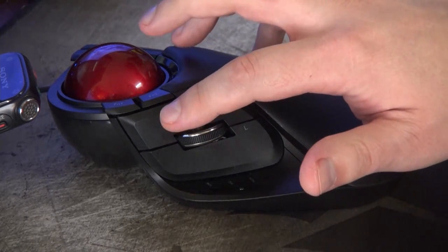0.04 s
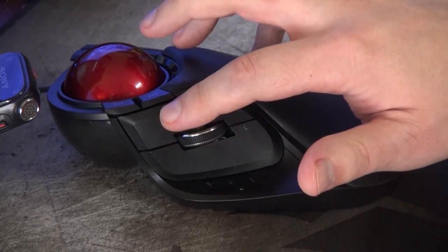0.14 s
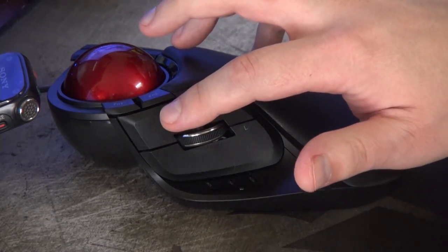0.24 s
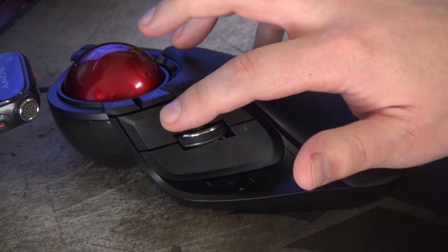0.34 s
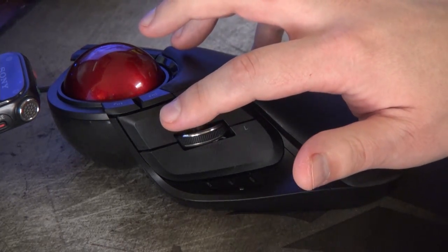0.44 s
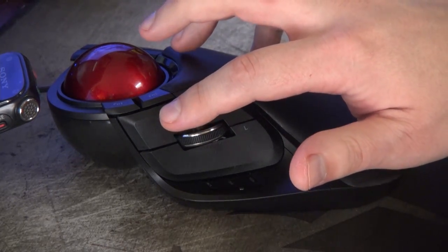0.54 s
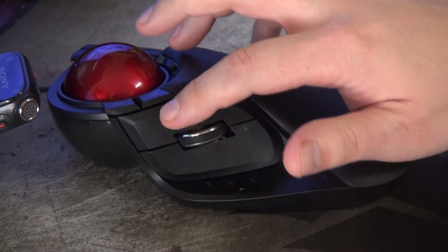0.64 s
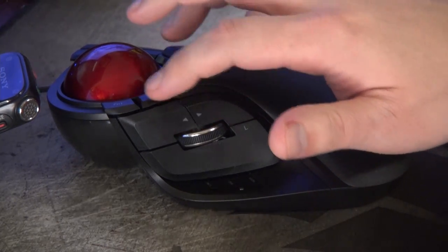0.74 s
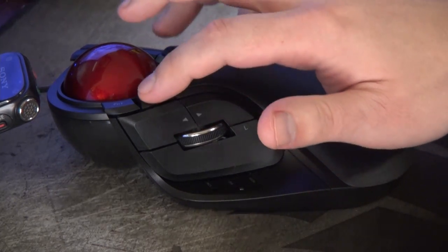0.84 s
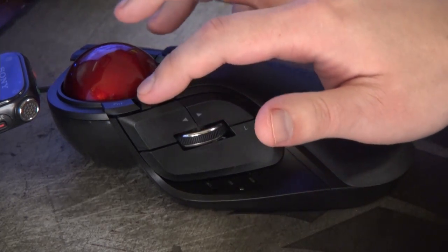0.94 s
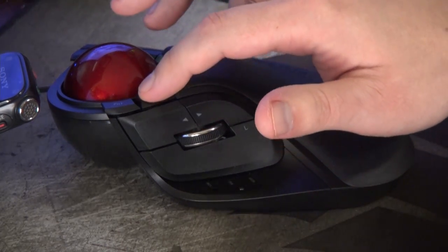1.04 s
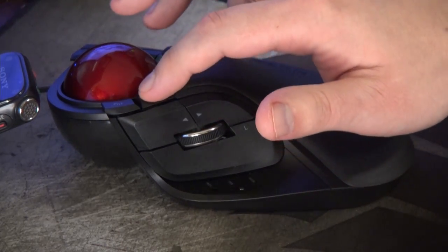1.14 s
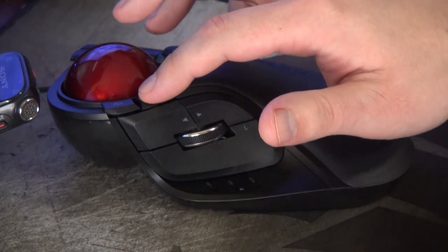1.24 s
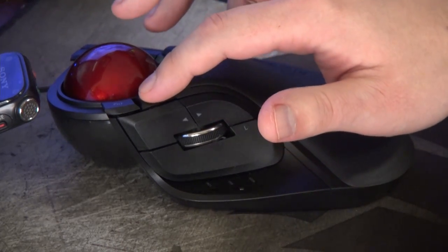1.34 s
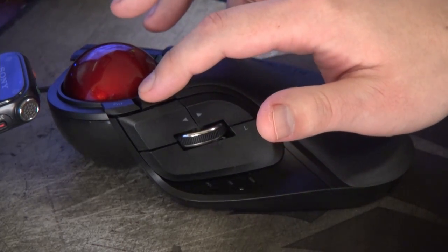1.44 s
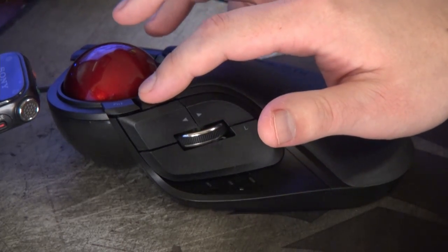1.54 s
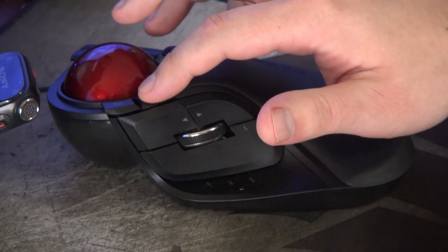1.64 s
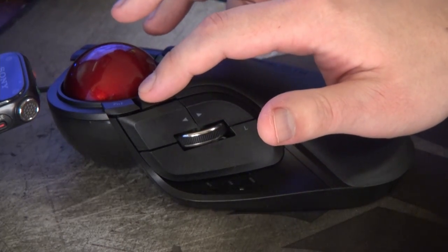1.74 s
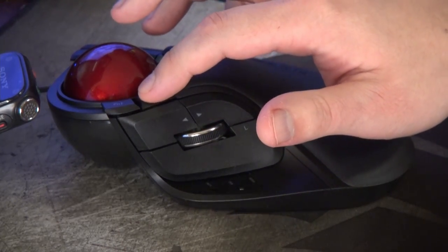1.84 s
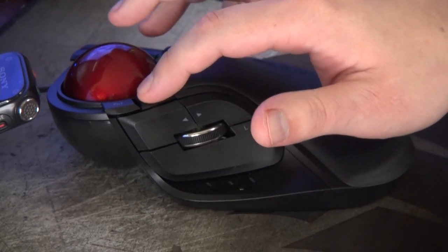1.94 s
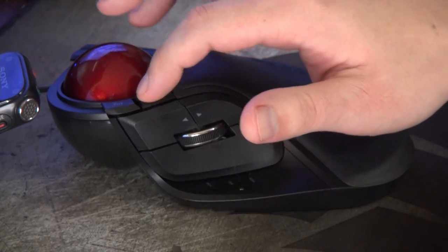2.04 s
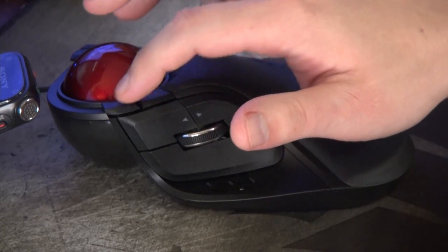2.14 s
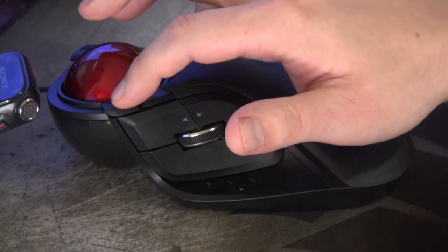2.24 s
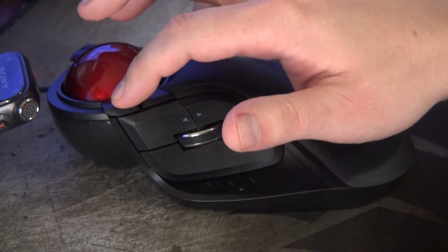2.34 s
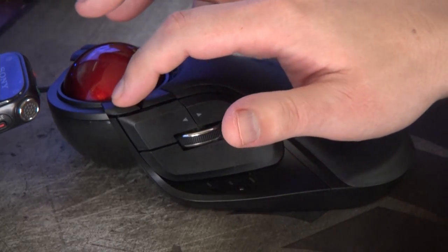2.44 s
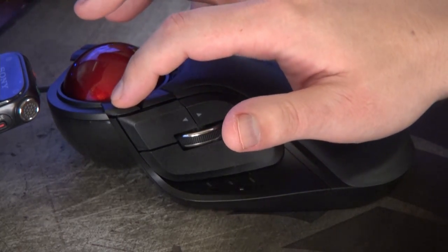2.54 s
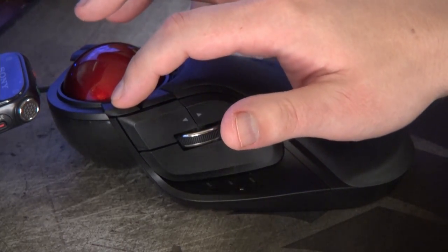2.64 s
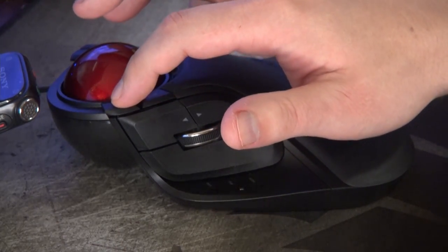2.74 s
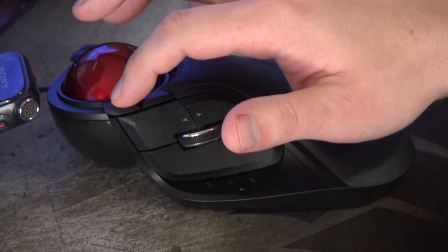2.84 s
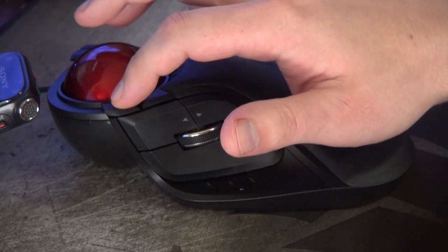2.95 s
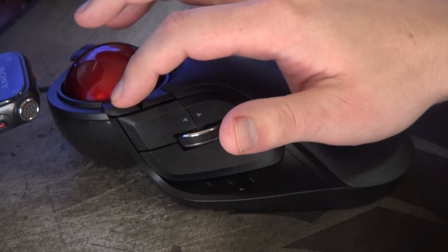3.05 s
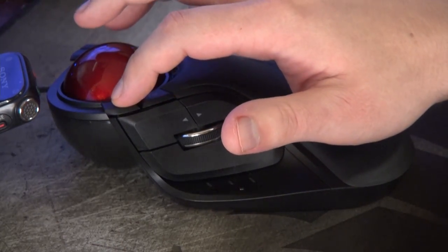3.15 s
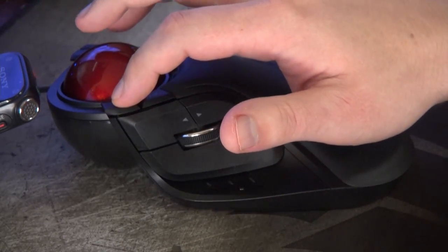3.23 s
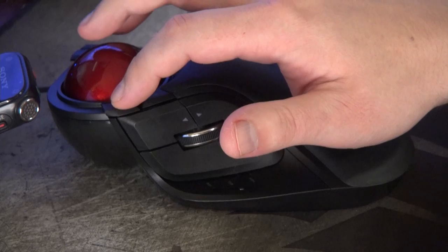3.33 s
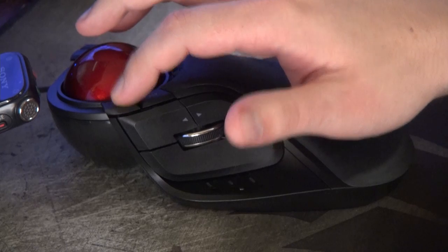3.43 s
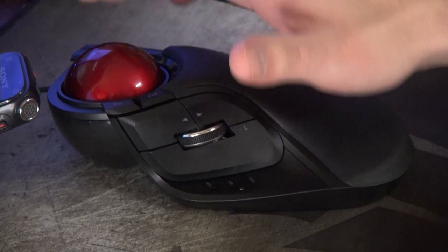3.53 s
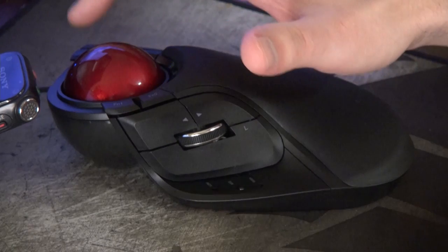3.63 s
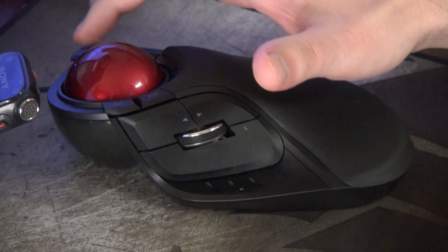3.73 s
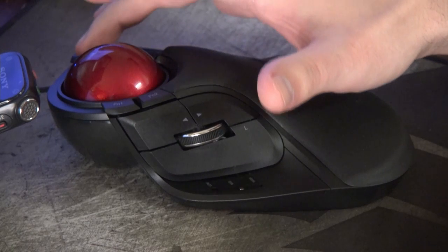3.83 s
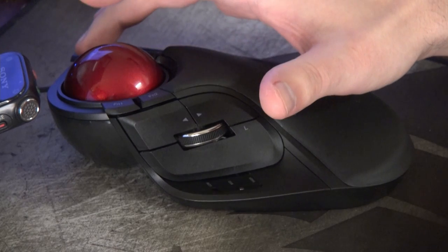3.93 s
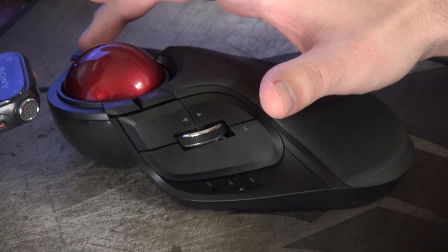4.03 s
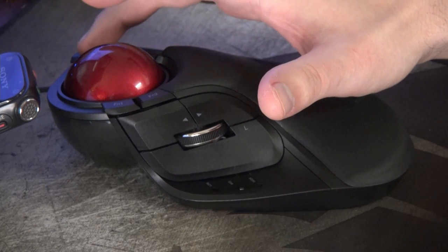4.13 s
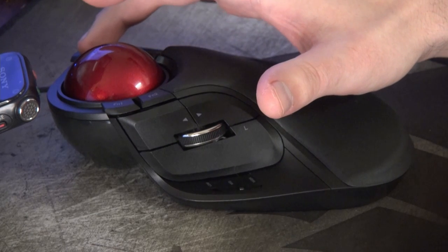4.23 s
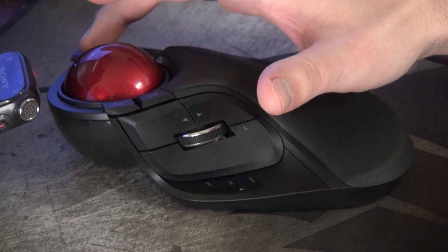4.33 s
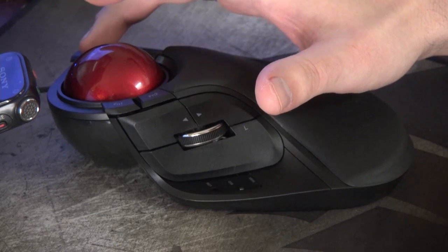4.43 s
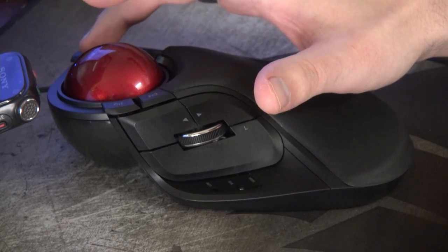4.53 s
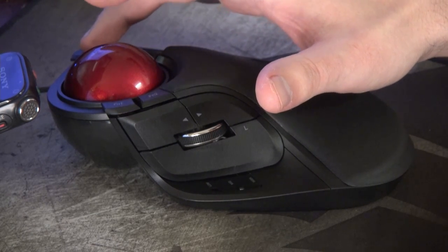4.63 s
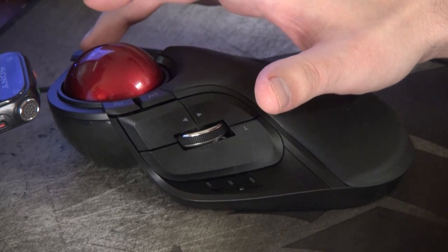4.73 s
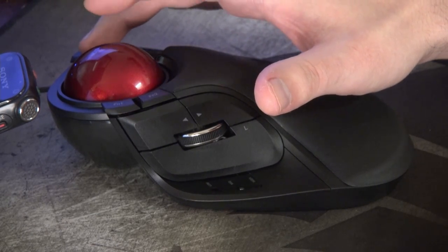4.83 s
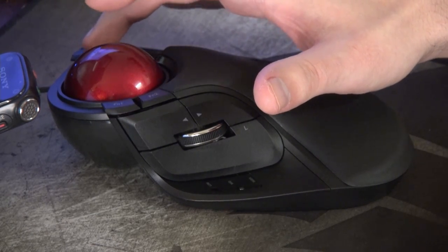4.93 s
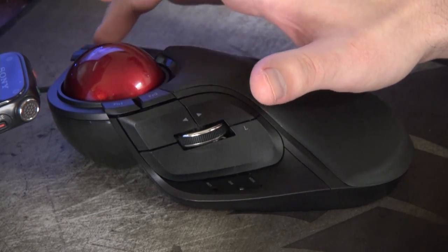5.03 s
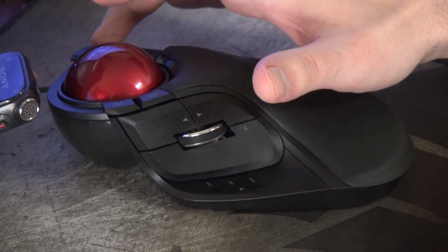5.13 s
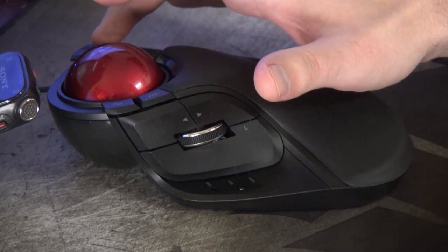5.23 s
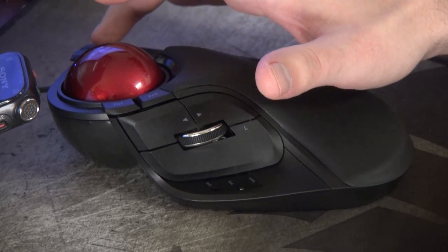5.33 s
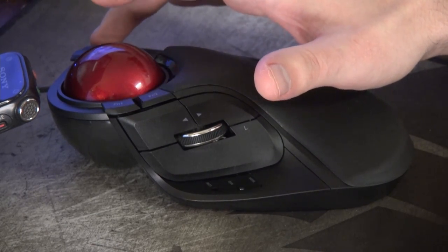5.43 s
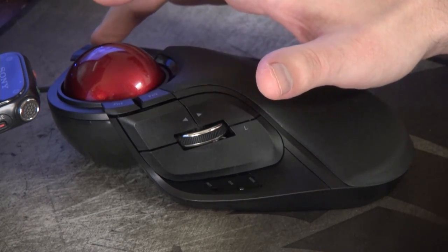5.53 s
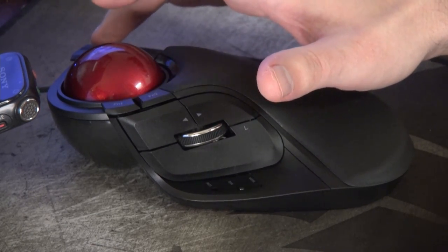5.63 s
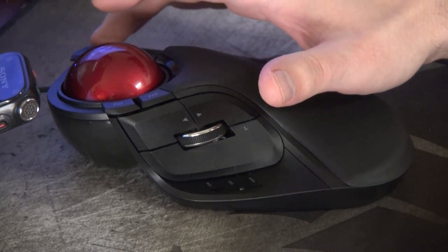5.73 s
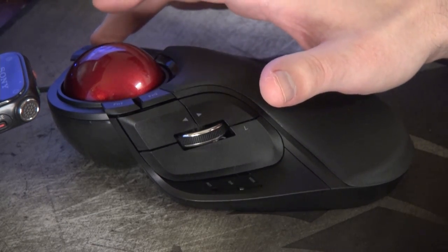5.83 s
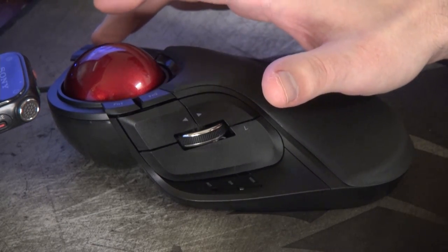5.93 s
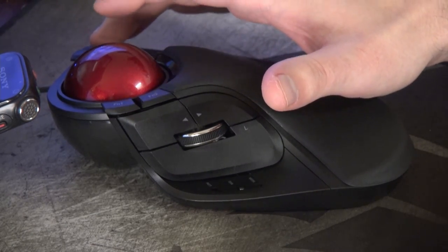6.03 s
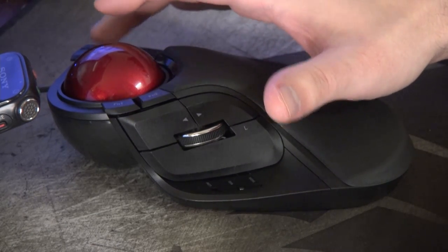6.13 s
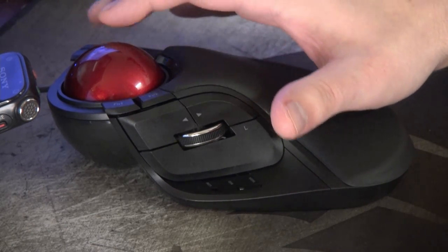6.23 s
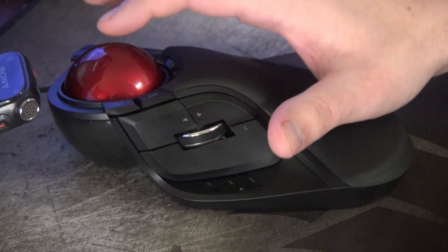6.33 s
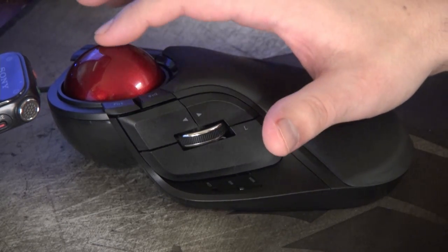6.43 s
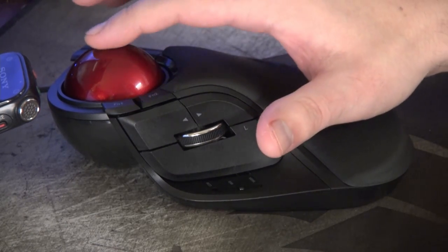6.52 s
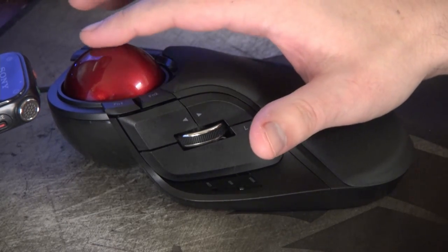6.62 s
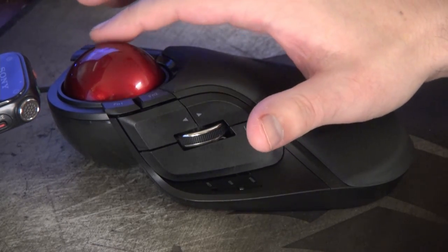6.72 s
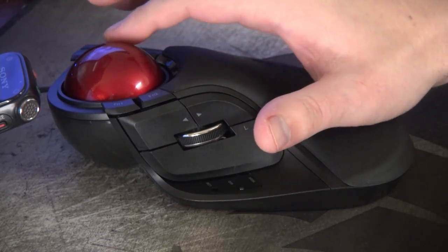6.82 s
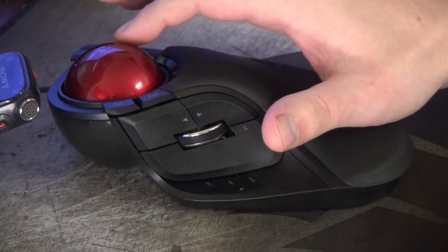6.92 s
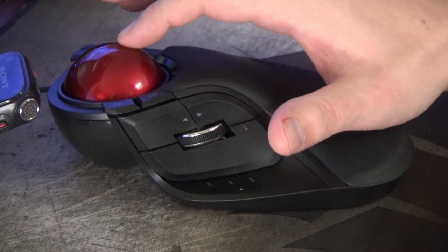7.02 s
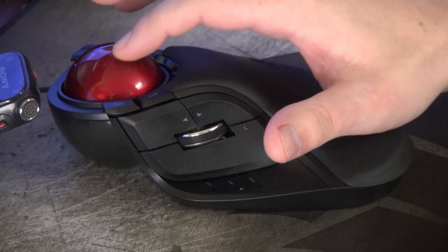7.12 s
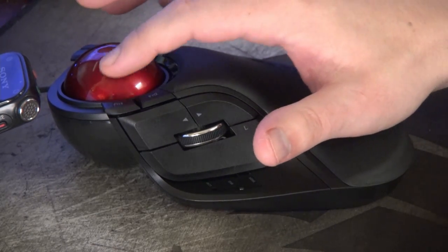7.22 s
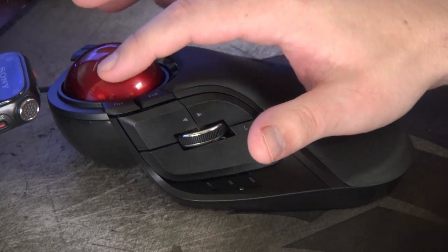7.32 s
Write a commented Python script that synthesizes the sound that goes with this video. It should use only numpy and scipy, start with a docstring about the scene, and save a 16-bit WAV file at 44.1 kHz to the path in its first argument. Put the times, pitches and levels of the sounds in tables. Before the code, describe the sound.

Dry, snappy press-and-release switch clicks in five groups, growing brighter, ending with soft ball rolling in a quiet room with a fan.

```python
"""Trackball buttons and ball

Five buttons of a desktop trackball click in turn, close up: the wheel, two thumb buttons, two bright finger buttons.
Each microswitch snaps on the way down and on the way up, ringing decaying modes of spring, cap and housing.
Fingers nudge loose caps with rings, noisy scuffs and thuds; at the end one rolls the ball over its bearings,
as noise grains through resonances. A fan hums, as shaped noise and wavering tones, in the small, dry room."""
import sys
import numpy as np
from scipy import signal
from scipy.fft import rfft, irfft, next_fast_len
from scipy.io import wavfile
from scipy.ndimage import uniform_filter1d, map_coordinates

SR = 44100
rng = np.random.default_rng(int(sys.argv[2]) if len(sys.argv) > 2 else 0)


def unload_audio(sound):
    """Save the sound as a 16-bit wav file, at the path given as the first command line argument."""
    columns = np.transpose(np.atleast_2d(sound))
    # keep every value between -1 and 1, then stretch to whole-number steps
    steps = np.round(np.clip(columns, -1, 1) * 32767)
    wavfile.write(sys.argv[1], SR, steps.astype(np.int16))


N = 325017  # length [samples]
LEAD = SR // 400  # silence in front of each snap [samples]

# Relative spectrum of skin brushing plastic: (frequency [Hz], density [dB per Hz])
SKIN_SPECTRUM = [(600, -10.5), (1800, -15), (3200, -11.5), (4300, 2.5), (4900, 1), (6500, -7.5),
                 (15000, -12)]


def wheel_button():
    """The wheel's switch: its snaps ring the wheel's own modes and shell."""
    # Alternate presses and releases: (time [s], level [dB], cap knock [dB], spring brightness [dB])
    clicks = [(.1411, -0.5, 0.5, 4.5), (.3032, -4, 3.5, 7), (.4883, 1.5, -0.5, 2), (.7072, -1, -1, 1)]
    # Strong modes when pressed and when let go: (frequency [Hz], level [dB], t60 [s])
    down = [(683, -36.5, 0.069), (950, -38, 0.043), (1274, -28, 0.02), (1564, -23, .021),
            (1817, -20, 0.019), (2380, -33, 0.019), (2810, -30, .006), (3400, -40, 0.03),
            (5760, -29, 0.012), (13400, -27, .009)]
    up = [(690, -39, 0.022), (970, -33, 0.048), (1296, -26.5, 0.026), (1556, -23, 0.023),
          (1783, -24.5, 0.021), (2410, -34, 0.035), (2870, -30.5, 0.0074), (3430, -40, 0.034),
          (5870, -19.5, 0.01), (10510, -32, 0.0047), (13440, -32, 0.012), (14970, -32, 0.009)]
    # Drive of the dense housing modes: (frequency [Hz], press level [dB], release level [dB])
    shell = [(500, -62, -56), (1720, -60, -52), (3250, -63, -50), (4400, -44.5, -39), (6500, -46.5, -41),
             (9000, -45, -43), (12200, -49.5, -49), (15500, -41, -31)]
    return microswitch(clicks, down, up, shell, chatter=0.0012, press_db=-0.5, release_db=0.0)


def forward_thumb_button():
    """The forward thumb button: a switch under a cap with its own modes."""
    # Alternate presses and releases: (time [s], level [dB], cap knock [dB], spring brightness [dB])
    clicks = [(0.9111, 0.67, -0.5, 3.5), (1.0754, 1, -0.26, 0.5), (1.249, -0.64, 1, 1.5),
              (1.4017, 0.61, 0, 0.5), (1.5698, 1.8, -0.76, 2.5), (1.7444, 0.73, 0.5, 1),
              (1.9188, -1, 1.8, 4), (2.0803, 0.61, 0, -1.5)]
    # Strong modes when pressed and when let go: (frequency [Hz], level [dB], t60 [s])
    down = [(725, -35, 0.031), (940, -41.5, 0.044), (1210, -33.5, 0.039), (1277, -30.5, 0.027),
            (1744, -29.5, 0.021), (2040, -34.5, 0.012), (3070, -36.5, 0.015), (3740, -38, 0.013),
            (4040, -32.5, 0.013), (5400, -33, 0.009), (8340, -23, 0.0047), (13500, -28, 0.006)]
    up = [(770, -38, 0.026), (1240, -30.5, 0.019), (1760, -31, 0.018), (2000, -45, 0.028),
          (2970, -38, 0.0082), (4080, -32.5, 0.016), (5420, -31.5, 0.0087), (5930, -34, 0.0064),
          (6500, -39, 0.02), (8200, -40, 0.014), (10100, -28, 0.0035), (14040, -35, 0.007)]
    # Drive of the dense housing modes: (frequency [Hz], press level [dB], release level [dB])
    shell = [(500, -60, -59), (900, -56, -53), (1700, -60, -63), (2400, -41.5, -49), (3200, -48, -54),
             (4330, -41.5, -38), (6500, -46, -48), (9000, -39, -46), (12000, -51, -50), (15500, -50, -48)]
    return microswitch(clicks, down, up, shell, chatter=0.0011, press_db=-0.46, release_db=-0.36)


def back_thumb_button():
    """The back thumb button: the switch with the shortest contact chatter."""
    # Alternate presses and releases: (time [s], level [dB], cap knock [dB], spring brightness [dB])
    clicks = [(2.2625, 0, 1.2, 1.7), (2.4389, 0.89, 0, 0.36), (2.6115, 0.65, 0.61, 0.62),
              (2.8022, 0.28, 0.77, 0.18), (2.9694, 0.23, 0.61, -0.16), (3.1312, 0.19, -1, 0.69),
              (3.3345, 0.43, 0.32, -0.77), (3.47, 0.85, 0.61, 2)]
    # Strong modes when pressed and when let go: (frequency [Hz], level [dB], t60 [s])
    down = [(703, -35, 0.03), (754, -43, 0.028), (797, -33, 0.024), (960, -37, 0.05), (1236, -32, 0.022),
            (1690, -30.5, 0.014), (3090, -47, 0.05), (5290, -29, 0.0084), (7660, -31, 0.009),
            (8360, -25, 0.013), (9990, -32, 0.006), (13300, -16, 0.019)]
    up = [(693, -36, 0.031), (810, -34.5, 0.023), (954, -39.5, 0.067), (1237, -33, 0.022),
          (1710, -33, 0.024), (2340, -46, 0.037), (2680, -49, 0.043), (3130, -46, 0.032),
          (5600, -29.5, 0.0063), (7000, -33.5, 0.013), (7800, -32, 0.009), (9860, -23.5, 0.0032)]
    # Drive of the dense housing modes: (frequency [Hz], press level [dB], release level [dB])
    shell = [(500, -58, -63), (900, -50, -58), (1680, -49, -44), (2390, -43, -56), (3050, -47.5, -48.5),
             (4410, -30.5, -29), (6300, -42, -43), (9000, -44, -41.5), (12800, -38, -43), (15600, -42, -33)]
    return microswitch(clicks, down, up, shell, chatter=0.00071, press_db=0.45, release_db=0.64)


def inner_finger_button():
    """The inner finger button: bright, with its strongest modes in the treble."""
    # Alternate presses and releases: (time [s], level [dB], cap knock [dB], spring brightness [dB])
    clicks = [(3.8389, 2.5, -0.7, 1), (3.9865, 1.3, -1, 3), (4.1542, 0.9, -1.5, -0.5),
              (4.2917, -1, -3.5, 2), (4.4799, 1, -1, 0), (4.6445, -0.3, -3.5, 0), (4.8238, 0, 0.59, 0),
              (4.9536, 1, -0.5, -1)]
    # Strong modes when pressed and when let go: (frequency [Hz], level [dB], t60 [s])
    down = [(590, -54, 0.03), (960, -33, 0.018), (1750, -38, 0.025), (3860, -32.5, 0.0061),
            (4300, -27.5, 0.012), (5560, -26, 0.0068), (8100, -35, 0.021), (8950, -25.5, 0.007),
            (11050, -19.5, 0.007), (12140, -18, 0.0065), (13500, -17, 0.006), (14000, -19, 0.0048)]
    up = [(1740, -29, 0.016), (3650, -28, 0.0034), (4150, -20.5, 0.01), (5290, -26, 0.0068),
          (5960, -25.5, 0.014), (6360, -28, 0.015), (7520, -27, 0.024), (9130, -19, 0.01),
          (12240, -16.5, 0.0054), (13210, -10, 0.0092), (14000, -23, 0.018), (14600, -16, 0.0049)]
    # Drive of the dense housing modes: (frequency [Hz], press level [dB], release level [dB])
    shell = [(504, -40, -53.5), (890, -48, -34.5), (1720, -47, -44.5), (2550, -48.5, -38), (3120, -55, -44),
             (4280, -42.5, -57), (6900, -31, -31.5), (9000, -34, -34), (12100, -41, -25.5),
             (15500, -27, -21.5)]
    return microswitch(clicks, down, up, shell, chatter=0.0013, press_db=0.0, release_db=0.44)


def outer_finger_button():
    """The outer finger button: bright, with strong treble modes on both strokes."""
    # Alternate presses and releases: (time [s], level [dB], cap knock [dB], spring brightness [dB])
    clicks = [(5.1107, 1, 1, 4), (5.2753, -0.36, -3, 1), (5.4444, -0.5, -4, 3), (5.5708, -2.1, -2, 0.5),
              (5.7296, -0.39, -3, 4), (5.8897, -1.6, -1.5, 1.5), (6.0446, -0.42, -0.5, 3),
              (6.155, -0.99, -0.5, -3.5)]
    # Strong modes when pressed and when let go: (frequency [Hz], level [dB], t60 [s])
    down = [(625, -41, 0.034), (876, -40.5, 0.02), (2800, -36.5, 0.006), (5050, -25.5, 0.0072),
            (5690, -24, 0.0037), (6690, -24, 0.008), (6950, -32.5, 0.021), (8340, -20.5, 0.0058),
            (10550, -12.5, 0.0096), (10880, -13, 0.0099), (12830, -21, 0.0068), (14500, -20.5, 0.005)]
    up = [(580, -38.5, 0.028), (1620, -30, 0.017), (3080, -36, 0.015), (4150, -16.5, 0.011),
          (8380, -17.5, 0.0063), (9020, -16, 0.016), (9500, -26, 0.018), (10400, -11, 0.007),
          (10500, -18, 0.021), (12500, -6.5, 0.013), (13450, -7.5, 0.008), (14150, -7, 0.0044)]
    # Drive of the dense housing modes: (frequency [Hz], press level [dB], release level [dB])
    shell = [(500, -52.5, -47), (898, -53, -37), (1690, -43, -41), (2660, -51, -36), (3300, -55, -50),
             (4200, -30.5, -30), (6670, -59, -22), (9100, -34.5, -32.5), (12300, -35, -19.5),
             (15500, -42, -21)]
    return microswitch(clicks, down, up, shell, chatter=0.0013, press_db=1.5, release_db=-1.27)


def microswitch(clicks, down, up, shell, chatter, press_db, release_db):
    """A switch snaps down and up; each stroke repeats its own ring with small changes."""
    # Decay of the dense housing modes: (frequency [Hz], t60 [s])
    shell_t60 = [(700, 0.045), (2000, 0.022), (5000, 0.0095)]
    # the cap's low modes swell just after the snap
    knock_hz, knock_rise_s, knock_hold_s = 2250, 0.00076, 0.001
    track, shell = np.zeros(N), np.array(shell)
    for stroke, (strong, stroke_db) in enumerate([(down, press_db), (up, release_db)]):
        dense_hz = np.arange(500, 16400, 200) + rng.uniform(-70, 70, 80)
        dense_db = along(shell[:, [0, stroke + 1]], dense_hz)
        dense = np.column_stack([dense_hz, dense_db, along(shell_t60, dense_hz)])
        modes = np.vstack([strong, dense])
        phase = rng.uniform(0, 2 * np.pi, len(modes))
        low = 1 / (1 + (modes[:, :1] / knock_hz) ** 6)  # near 1 for low modes, 0 for high ones
        hold, rise = chatter + knock_hold_s * low, 0.0001 + knock_rise_s * low
        for s, db, knock_db, bright_db in clicks[stroke::2]:
            # the finger never lands twice on quite the same spot
            click_phase = phase + 0.56 * rng.standard_normal(len(modes))
            rows = ring(modes, click_phase, hold, rise)
            tilt = [(1900, knock_db), (3000, 0), (8000, 0), (10500, bright_db)]  # (Hz, dB)
            mode_gain = amp(db + stroke_db + along(tilt, modes[:, 0]))
            snap = even_out(rows * mode_gain[:, None], width_hz=720)
            add(track, s - LEAD / SR, in_room(snap))
            hiss = shiver(t60=0.064, rise=0.004, low_hz=2500)
            add(track, s, amp(-24.5) * np.linalg.norm(snap) * hiss)
    return track


def ring(modes, phase, chatter, rise):
    """One row per mode: driven while the contact chatters, then dying freely."""
    t = np.arange(SR // 20) / SR
    hz, db, t60 = np.transpose(modes)[:, :, None]
    free_time = np.maximum(t - chatter, 0)
    envelope = (1 - np.exp(-t / rise)) * amp(db - 60 * free_time / t60)
    return envelope * np.sin(2 * np.pi * hz * t + phase[:, None])


def even_out(rows, width_hz):
    """Sum the modes so that each band keeps their joint energy, however they overlap."""
    spectra = rfft(np.pad(rows, [(0, 0), (LEAD, 0)]))
    bins = max(1, round(width_hz * (rows.shape[1] + LEAD) / SR))

    def smooth(power):
        return np.abs(uniform_filter1d(uniform_filter1d(power, bins), bins))

    total = spectra.sum(axis=0)
    joint_power = smooth((np.abs(spectra) ** 2).sum(axis=0))
    summed_power = smooth(np.abs(total) ** 2)
    return irfft(total * np.sqrt(joint_power / summed_power))


def shiver(t60, rise, low_hz):
    """The loose plastic parts shiver after a snap: a fading hiss of energy 1."""
    t = np.arange(SR // 8) / SR
    hiss = filtered(rng.standard_normal(len(t)), lambda f: f ** 2 / (f ** 2 + low_hz ** 2))
    hiss = hiss * (1 - np.exp(-t / rise)) * amp(-60 * t / t60)
    return hiss / np.linalg.norm(hiss)


def nudges():
    """A finger brushes and rocks a loose cap; the hollow housing answers with a thud."""
    # Each nudge: (time [s], cap ring [dB], skin scuff [dB], hollow thud [dB], thud pitch [Hz])
    touches = [(0.707, -37, -16, -50, 790), (0.8108, -49, -42, -51, 900), (.8411, -37, -49, -54, 915),
               (2.1242, -40, -35, -39.5, 980), (3.821, -47, -30.5, -42, 780),
               (3.8395, -42, -44, -36.5, 593), (4.3501, -53, -59, -40.5, 584),
               (4.968, -41.5, -26, -30, 747), (5.2805, -37, -24.5, -38.5, 593), (6.134, -47, -38, -54, 806),
               (6.1552, -40, -18, -52, 644)]
    # Modes of a loose cap, relative to its ring level: (frequency [Hz], level [dB], t60 [s])
    cap_modes = [(903, -3.5, 0.06), (1182, -4.5, 0.035), (1727, 4.5, 0.025), (1943, -2, 0.026),
                 (2680, -6, 0.033), (4430, -9, 0.017), (4630, -17, 0.019), (5270, -13, 0.011),
                 (6900, -28, .015)]
    # Modes of the hollow housing: (multiple of the thud pitch [ratio], level re thud [dB], t60 [s])
    hollow_modes = [(1, 0, 0.055), (1.25, -2.5, 0.027), (1.66, 1, 0.016)]
    track = np.zeros(N)
    for s, cap_db, scuff_db, thud_db, thud_hz in touches:
        cap = np.array(cap_modes) + [0, cap_db, 0]
        hollow = np.array(hollow_modes) * [thud_hz, 1, 1] + [0, thud_db, 0]
        modes = np.vstack([cap, hollow])
        phase = rng.uniform(0, 2 * np.pi, len(modes))
        rows = ring(modes, phase, chatter=0.0027, rise=0.00098)
        add(track, s - LEAD / SR, in_room(even_out(rows, width_hz=350)))
        add(track, s, in_room(amp(scuff_db) * scuff(t60=0.016, rise=0.00043)))
    return track


def scuff(t60, rise):
    """A short noisy brush of skin on plastic."""
    t = np.arange(SR // 10) / SR
    noise = unit(filtered(rng.standard_normal(len(t)), lambda f: amp(along(SKIN_SPECTRUM, f))))
    return noise * (1 - np.exp(-t / rise)) * amp(-60 * t / t60)


def ball():
    """The ball rubs over its bearings: fine grains ring the socket while the fingertip brushes its top."""
    # Resonances of the bearing socket: (centre [Hz], width [Hz], relative level [dB])
    bearings = [(2210, 220, 2.5), (2600, 580, 0), (4150, 300, -14), (5150, 510, 1.5), (6330, 390, -4),
                (9400, 390, 1), (15000, 2000, -11)]

    def socket(f):
        return sum(amp(g) * 1j * f * w / (c * c - f * f + 1j * f * w) for c, w, g in bearings)

    grains = rng.standard_normal(N) * amp(3.2 * wobble(500))
    brushing = rng.standard_normal(N) * amp(4.9 * wobble(200))
    skin = unit(filtered(brushing, lambda f: amp(along(SKIN_SPECTRUM, f))))
    rub = amp(-1.5) * unit(filtered(grains, socket)) + amp(-6) * skin
    return rub * ball_speed() * amp(1.2 * wobble(30))


def ball_speed():
    """Each push spins the ball up, holds its speed and lets it coast to rest; speed sets the rub's gain."""
    # The fingertip pushes the ball: (start [s], length [s], rub gain [dB])
    pushes = [(6.505, 0.04, -55.5), (6.65, 0.18, -56), (6.983, 0.28, -54.5)]
    spin_up_s, coast_t60_s = 0.03, 0.6
    t = np.arange(N) / SR
    speed = np.zeros(N)
    for s, length, db in pushes:
        coasting = np.maximum(t - s - length, 0)
        speed += amp(db - 60 * coasting / coast_t60_s) * np.clip((t - s) / spin_up_s, 0, 1)
    return speed


def fan(air_db, waver_db):
    """Steady rush of air as shaped noise, with a few slightly unsteady tones."""
    # Relative spectrum of the room noise: (frequency [Hz], density [dB per Hz])
    air_spectrum = [(15, -34), (25, -18), (48, -16), (78, -13), (125, 0.5), (205, -4.5), (260, -0.5),
                    (600, -3), (1150, -9.5), (1720, -11.5), (2150, -16), (3200, -21), (6000, -24),
                    (15700, -25.5)]
    # Mains, fan and electronic whine, before wavering: (frequency [Hz], rms level [dB])
    whines = [(59.5, -75), (107.5, -64.5), (714, -60.5), (1071, -58), (8000, -68.5)]
    t = np.arange(N) / SR
    air = unit(filtered(rng.standard_normal(N), lambda f: amp(along(air_spectrum, f))))
    tones = np.zeros(N)
    for hz, db in whines:
        level = amp(db + waver_db * wobble(3.0)) * np.sqrt(2)  # rms to peak
        tones += level * np.sin(2 * np.pi * hz * t + 0.28 * wobble(5))
    return amp(air_db) * air + tones


def in_room(sound):
    """A sound with a few early echoes and a short diffuse tail of decaying noise."""
    # Reverberation time: (frequency [Hz], t60 [s])
    room_t60 = [(300, 0.23), (2000, 0.11), (12000, 0.15)]
    # Reverberation colour: (frequency [Hz], level [dB])
    room_db = [(600, -5), (1700, -11.5), (4500, -17.5), (9000, -20.5), (15000, -25.5)]
    # Nearby hard surfaces: (delay [s], level [dB])
    echoes = [(.0085, -40), (.0125, -46), (0.02, -30)]
    hz, t, z = signal.stft(rng.standard_normal(SR // 5), SR, nperseg=128)
    fade = amp(-60 * t / along(room_t60, hz)[:, None]) * (1 - np.exp(-(t / 0.0016) ** 2))
    tail = signal.istft(z * fade, SR, nperseg=128)[1]
    answer = filtered(tail / np.linalg.norm(tail), lambda f: amp(along(room_db, f)))
    answer[0] = 1  # direct sound
    for delay, db in echoes:
        answer[round(delay * SR)] += amp(db)
    return signal.fftconvolve(sound, answer)


def amp(db):
    """Decibels to gain."""
    return 10 ** (np.asarray(db) / 20)


def unit(x):
    """Scale to rms 1."""
    return x / np.sqrt(np.mean(x ** 2) + 1e-20)


def along(points, hz):
    """Read (Hz, value) points on a log frequency axis."""
    f, v = np.transpose(points)
    return np.interp(np.log(hz + 1), np.log(f), v)


def wobble(rate):
    """A smooth random curve, rate knots a second."""
    knots = rng.standard_normal(int(N * rate / SR) + 4)
    return map_coordinates(knots, [np.arange(N) * rate / SR])


def filtered(x, response):
    """Filter x by a response given as a function of frequency."""
    size = next_fast_len(len(x) + SR // 2)
    spectrum = rfft(x, size) * response(np.fft.rfftfreq(size, 1 / SR))
    return irfft(spectrum, size)[:len(x)]


def add(track, s, sound):
    """Mix a sound into the track at time s."""
    part = track[round(s * SR):][:len(sound)]
    part += sound[:len(part)]


def scene():
    """The five buttons, the handling, the ball and the room noise."""
    clicks = wheel_button()
    clicks += forward_thumb_button() + back_thumb_button()
    clicks += inner_finger_button() + outer_finger_button()
    return (clicks + nudges() + ball() + fan(air_db=-47.5, waver_db=0.6))[None]


def record(dry):
    """Peaks bend softly below full scale, then a steep low-pass removes the extreme treble."""
    top_hz = 15900
    clipped = dry[0] / (1 + np.abs(dry[0]) ** 6) ** (1 / 6)
    return filtered(clipped, lambda f: 1 / np.sqrt(1 + (f / top_hz) ** 160))[None]


dry = scene()
out = record(dry)
unload_audio(out)
```